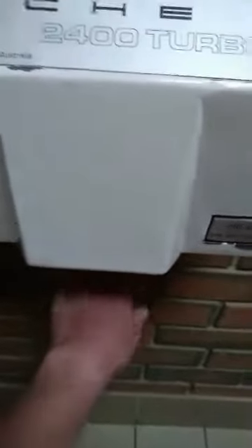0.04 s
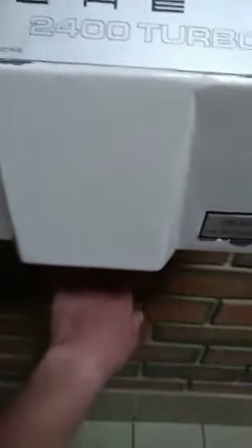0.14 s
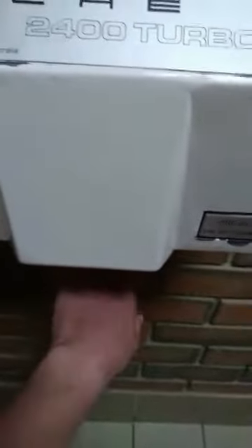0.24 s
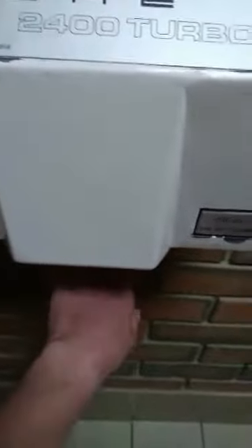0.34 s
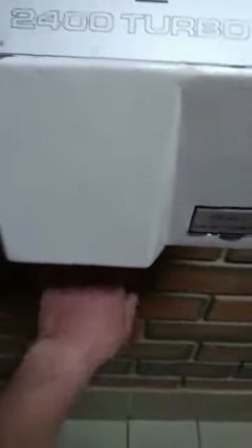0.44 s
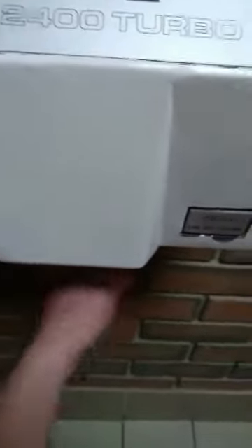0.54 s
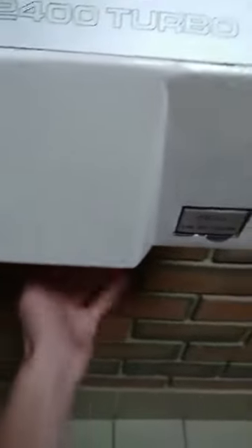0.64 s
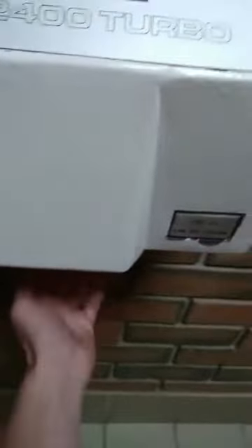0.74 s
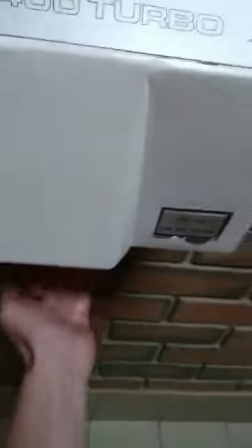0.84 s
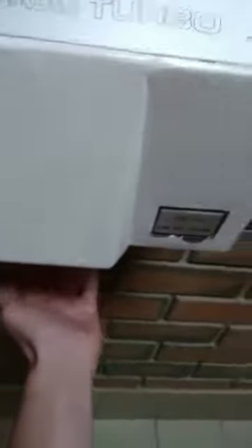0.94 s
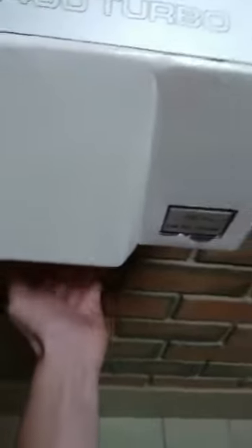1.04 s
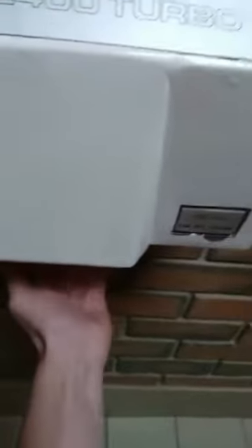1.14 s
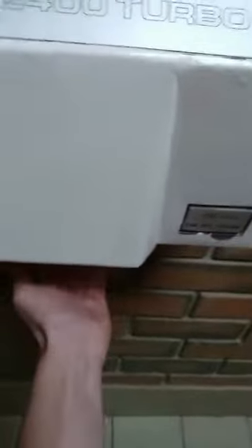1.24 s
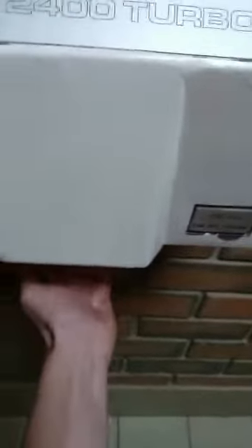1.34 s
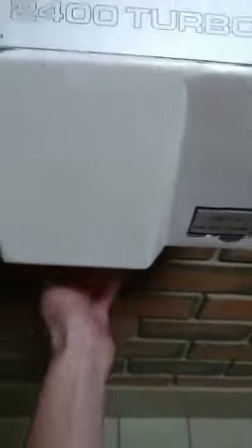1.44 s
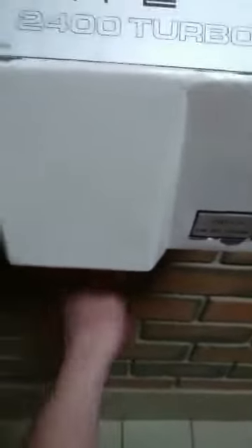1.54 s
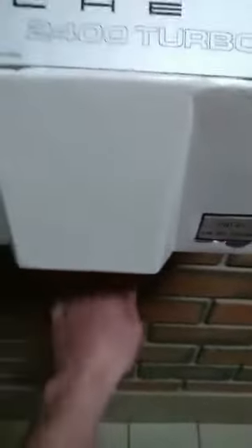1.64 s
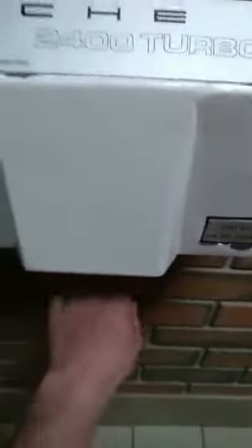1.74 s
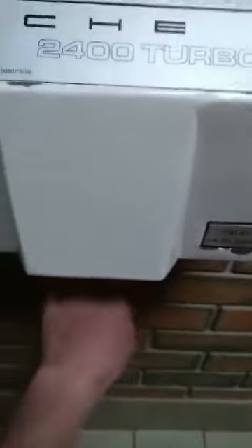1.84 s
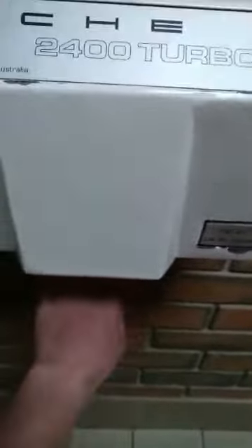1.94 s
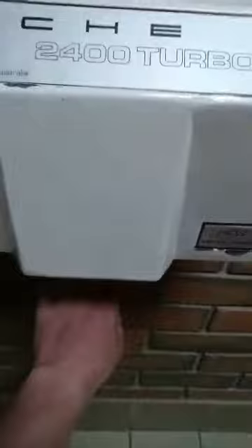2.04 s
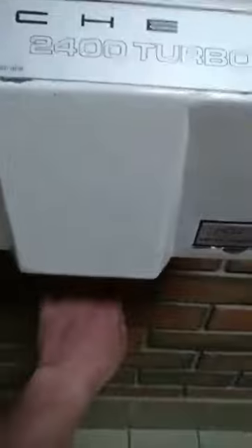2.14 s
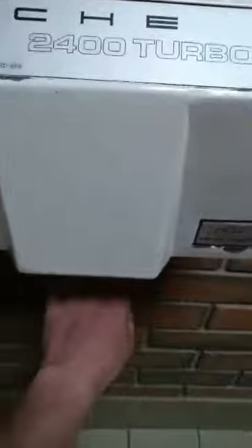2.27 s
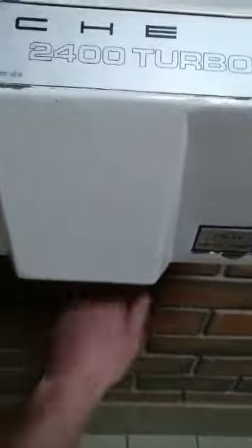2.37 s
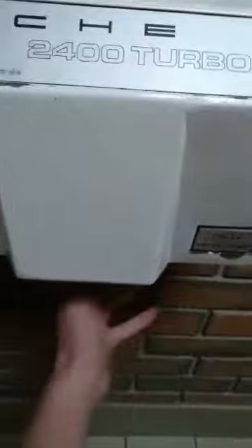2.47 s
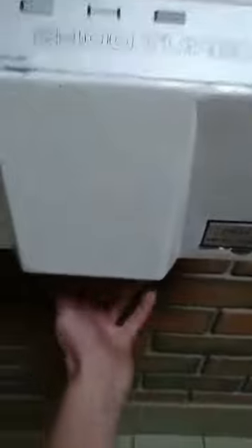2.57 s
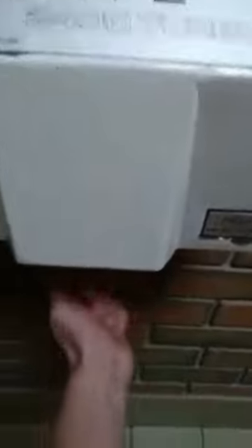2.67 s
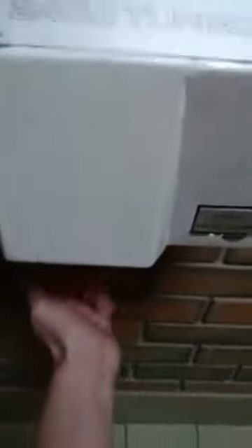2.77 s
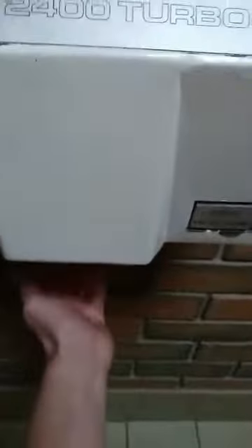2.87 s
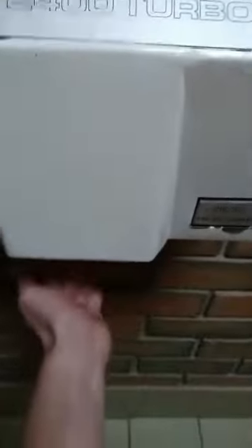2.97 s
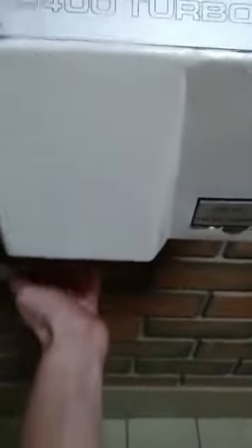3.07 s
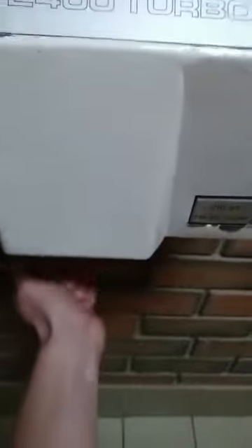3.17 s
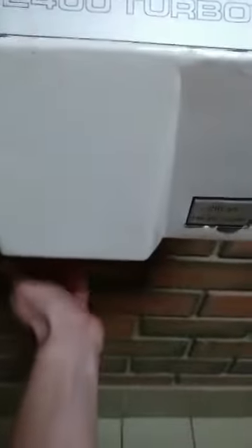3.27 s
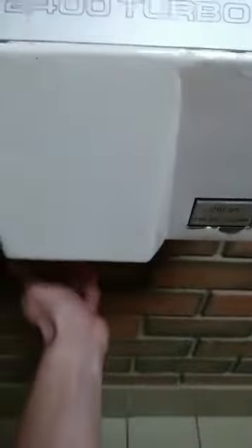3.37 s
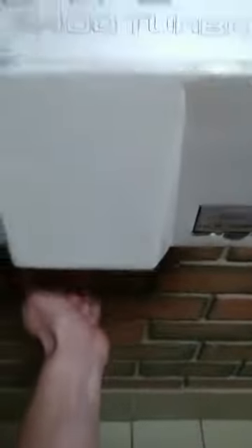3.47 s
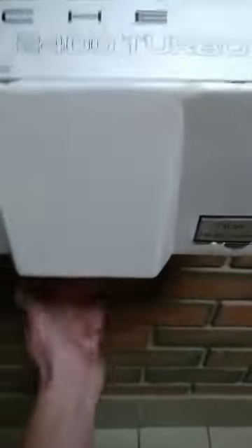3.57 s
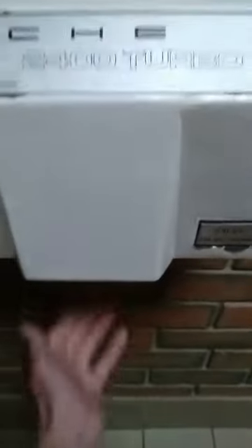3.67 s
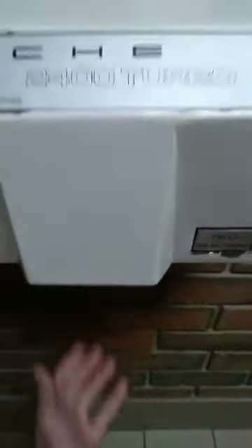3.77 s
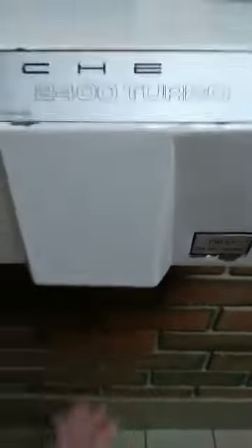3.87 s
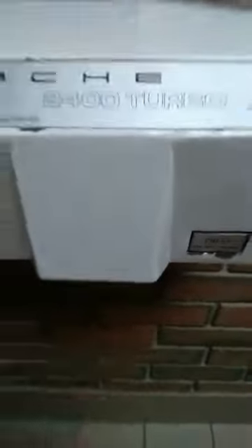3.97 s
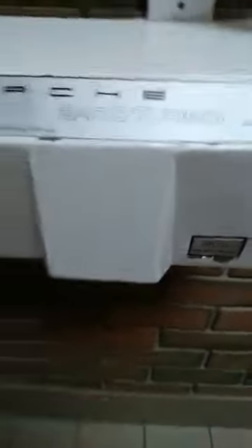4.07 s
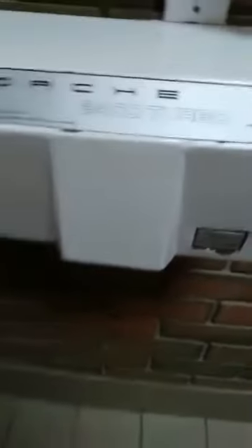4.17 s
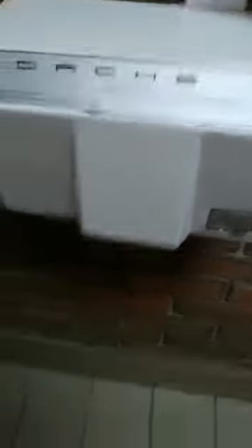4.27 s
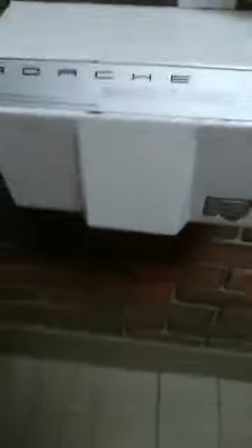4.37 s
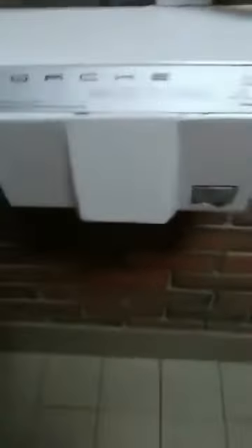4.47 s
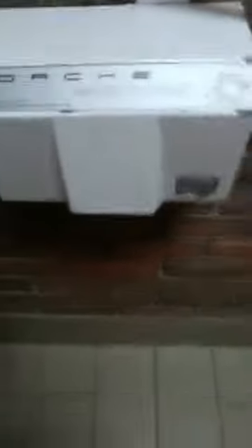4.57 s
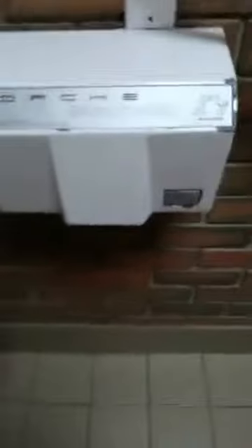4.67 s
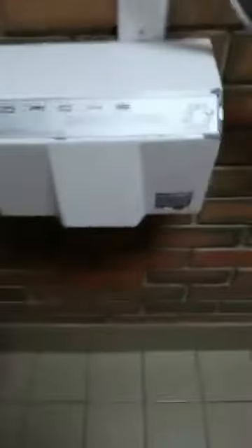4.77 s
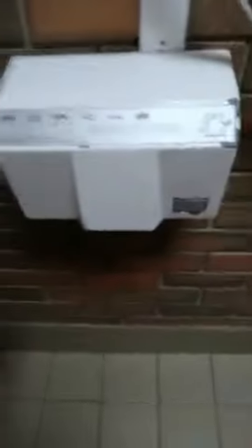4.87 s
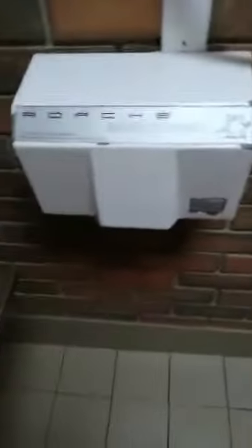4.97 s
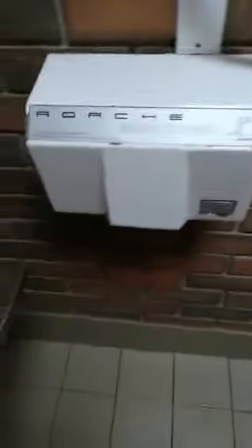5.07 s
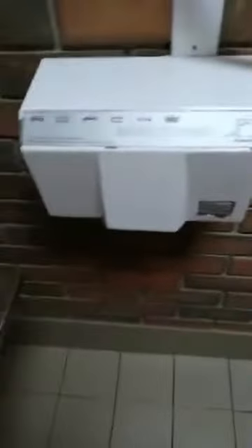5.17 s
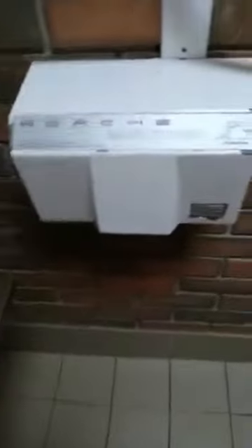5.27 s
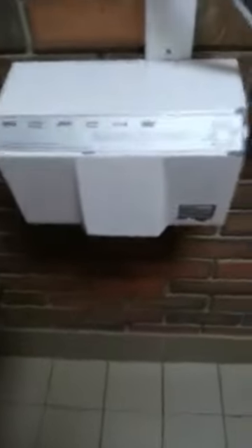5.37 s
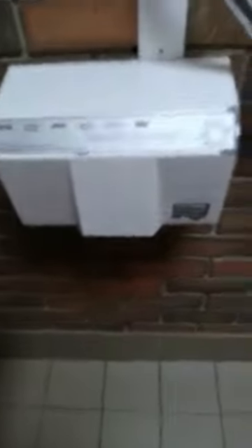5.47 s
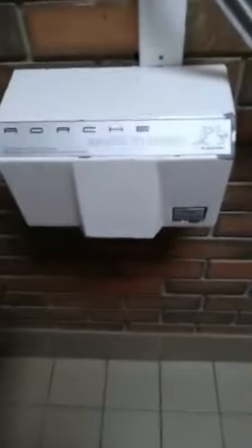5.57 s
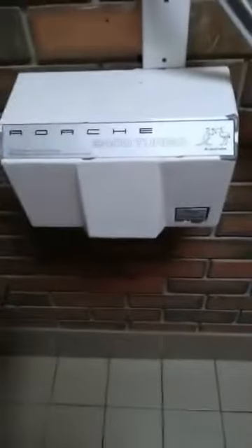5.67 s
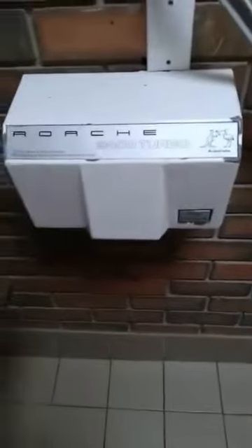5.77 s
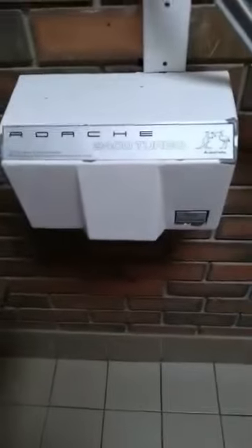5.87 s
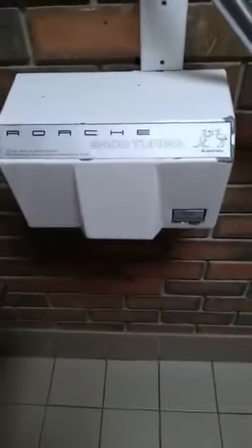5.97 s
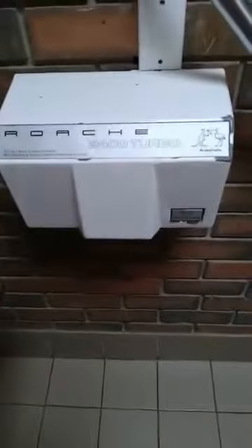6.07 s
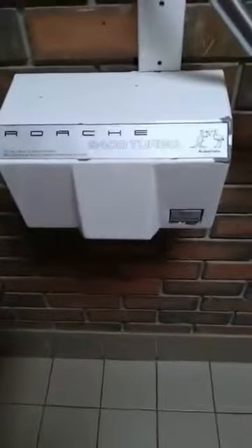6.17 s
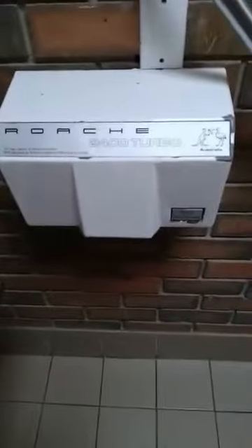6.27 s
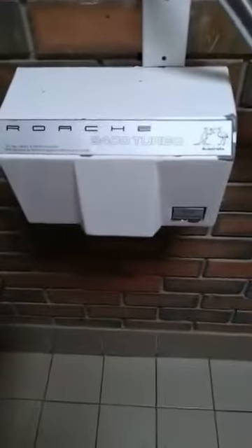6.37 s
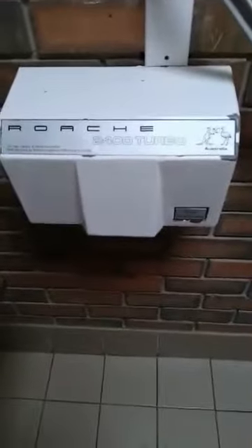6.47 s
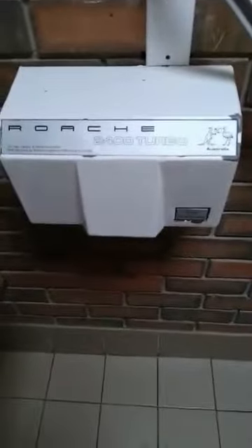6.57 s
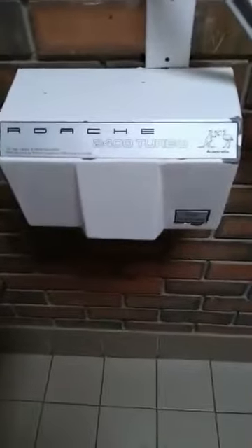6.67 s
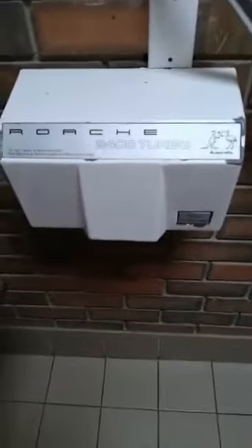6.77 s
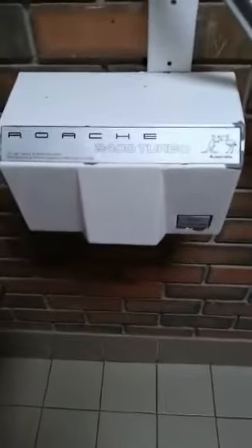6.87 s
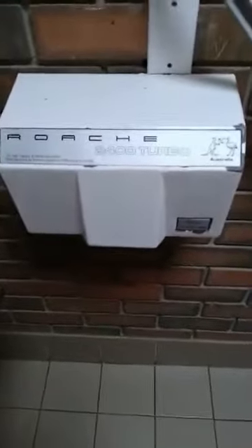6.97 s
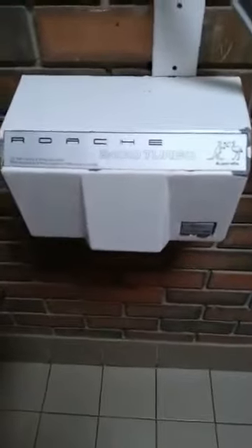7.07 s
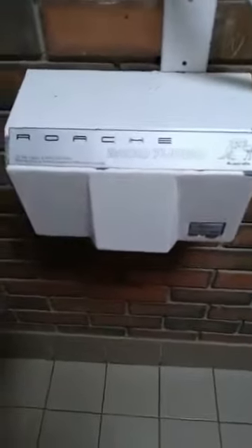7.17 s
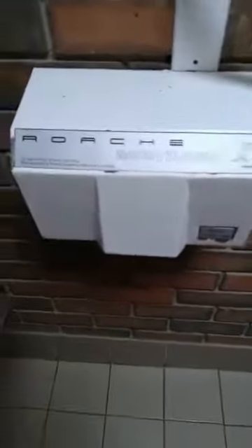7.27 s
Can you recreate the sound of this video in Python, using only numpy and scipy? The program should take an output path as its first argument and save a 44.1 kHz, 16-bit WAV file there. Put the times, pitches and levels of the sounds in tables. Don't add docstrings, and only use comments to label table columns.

```python
import sys
import numpy as np
from scipy import signal
from scipy.fft import rfft, irfft, next_fast_len
from scipy.io import wavfile
from scipy.ndimage import uniform_filter1d

SR = 44100
rng = np.random.default_rng(int(sys.argv[2]) if len(sys.argv) > 2 else 0)


def output_pcm(signal):
    pcm = np.clip(np.atleast_2d(signal).T, -1, 1) * 32767
    wavfile.write(sys.argv[1], SR, np.round(pcm).astype(np.int16))


def volts_from_db(level):
    exponent = np.asarray(level, float) / 20
    return 10 ** exponent


N = 322798
T = np.arange(N) / SR
OFF_S = 5.862
SINK_S, SINK_FADE_S, SINK_DB = 6.78, 0.038, -21


def evened(x):
    return x / np.sqrt(np.mean(x ** 2) + 1e-20)


def read(points, hz, axis=1):
    points = np.transpose(points)
    return np.interp(np.log(hz + 1), np.log(points[0] + 1), points[axis])


def curve(rows, t, axis):
    rows = np.transpose(rows)
    return np.interp(t, rows[0], rows[axis])


def wander(top_hz):
    coarse = T[::256]
    drift = 0
    for f in np.geomspace(top_hz / 20, top_hz, 20):
        drift = drift + np.sin(2 * np.pi * (f * coarse + rng.random())) / np.sqrt(f)
    return np.interp(T, coarse, evened(drift))


def sides(pan_db):
    left, right = volts_from_db(pan_db / 2), volts_from_db(-pan_db / 2)
    return np.array([left, right]) * 2 / (left + right)


FULL_HZ = 284.8
COAST_S, COAST_POWER, COAST_LAG_S = 0.45, 0.55, 0.01197
# [t/s, level/dB, left minus right/dB]
HUM = [(0.0, -23, 14), (0.08, -22, 11), (0.39, -23, 11), (1.1, -26, 15), (1.36, -24.5, 12), (1.94, -22, 10),
       (2.41, -22, 10), (2.79, -24, 12.5), (3.57, -23.5, 10), (4.33, -16, 4), (4.83, -17.5, 1.5),
       (5.2, -16.5, 0.5), (5.61, -17.5, 1.5), (5.82, -17, 0.5)]
# [f/Hz, width/Hz, level/dB, left minus right/dB]
SWEPT_MODES = [(281.7, 12, -17.5, 3.5), (252, 6, -41.5, 6), (242, 4.1, -34, 4), (228, 3.4, -34, 9),
               (215, 5, -43, -8.5), (205.2, 8.6, -29.5, 5), (187.2, 9, -35, 2), (163, 30, -41.5, -0.5)]


def blade_tone():
    coasting_s = np.maximum(T - OFF_S - COAST_LAG_S, 0)
    pitch_hz = FULL_HZ * (1 + coasting_s / COAST_S) ** -COAST_POWER
    steady = volts_from_db(curve(HUM, T, 1)) * sides(curve(HUM, T, 2))
    swept = 0
    for hz, width_hz, db, pan_db in SWEPT_MODES:
        resonance = 1 / (1 + (2 * (pitch_hz - hz) / width_hz) ** 2)
        swept = swept + volts_from_db(db) * sides(pan_db)[:, None] * resonance
    swept = swept * volts_from_db(SINK_DB * np.clip((T - SINK_S) / SINK_FADE_S, 0, 1))
    cut = np.clip((T - OFF_S) / 0.022, 0, 1)
    return pitch_hz, (1 - cut) * steady + cut * swept


# [t/s, distance (0 near, 1 far)]
STEP_BACK = [
    (0, 0.032),
    (3.55, 0.039),
    (4., 0.36),
    (4.4, 0.95),
    (5., 0.91),
    (7.32, 0.97),
]
# [multiple of the shaft turn, near level/dB, far level/dB, coasting level/dB]
SHAFT_ORDERS = [(1, -31, -38, -26), (2, -33, -34, -24), (12, -40, -35, -26), (13.31, -43, -37, -34),
                (15, -30, -39, -32), (17, -36, -41, -32), (18, -38, -40, -30)]
# [t/s, f/Hz, peak level/dB, t60/s, rise/s]
LEFT_RINGING = [
    (5.916, 247.3, -13, .5, 0.016),
]


def fan():
    blades = 6
    pitch_hz, ports = blade_tone()
    turn = 2 * np.pi * np.cumsum(pitch_hz + 0.25 * wander(6)) / SR / blades
    level = np.sqrt(2) * volts_from_db(0.5 * wander(11))
    lead = np.array([[0.08], [-0.08]])
    out = level * ports * np.sin(blades * turn + lead)

    far = curve(STEP_BACK, T, 1)
    coasting = np.clip((T - OFF_S) / 0.28, 0, 1)
    for k, near_db, far_db, coast_db in SHAFT_ORDERS:
        place_db = near_db + far * (far_db - near_db) + coasting * (coast_db - far_db)
        tone = np.sin(k * (turn + lead / 3) + 6 * rng.random())
        out += level * ports.mean(axis=0) * volts_from_db(place_db + 1.3 * wander(8)) * tone

    after = np.maximum(T - OFF_S, 0)
    turn_at_cut = np.interp(OFF_S, T, turn)
    fading = volts_from_db(-17.5 - 60 * after / 0.42) * np.clip(after / 0.035, 0, 1)
    out += fading * np.sin(blades * turn_at_cut + 2 * np.pi * FULL_HZ * after) * sides(1.5)[:, None]
    for s, hz, db, t60, rise_s in LEFT_RINGING:
        passed = np.maximum(T - s, 0)
        swell = volts_from_db(db - 60 * passed / t60) * np.clip(passed / rise_s, 0, 1)
        out += sides(6.0)[:, None] * swell * np.sin(2 * np.pi * hz * passed)
    return out


# [near level/dB, far level/dB, drop at the cut/dB, coasting fade/(dB/s), gate/dB]
AIR = [
    (0.77, -3, -1.5, -14, 0.1),
    (1.5, -2.5, 0.5, -26.5, 0.5),
    (-0.53, -1.5, -8, -16.5, -21.5),
    (-0.29, -5.5, -5, -42.5, -0.5),
]
AIR_HZ = [
    400,
    1500,
    5000,
    9000,
]
# [t/s, length/s, fizz level/dB]
GUSTS = [
    (0., .008, 10.5),
    (0.301, .02, 5.5),
    (0.799, .25, 3),
    (3.847, .3, 2.5),
    (4.951, 0.16, -2.5),
    (5.782, .3, 4.5),
]
GUST_SHARE = [
    .05,
    -.1,
    .35,
    0.97,
]
SINK_SHARE = [
    .05,
    .35,
    .01,
    .01,
]


def air_db(t, hz):
    far_bend = 2.2
    drop_s, gate_s, gate_fade_s, floor_db = 0.1, 6.33, 0.066, -48
    near_db, far_db, drop_db, fade_db, gate_db = np.transpose(AIR)[:, :, None]
    after = np.maximum(t - OFF_S, 0)
    bands = near_db + np.clip(curve(STEP_BACK, t, 1), 0, 1) ** far_bend * (far_db - near_db)
    gust_db = sum(db * np.exp(-((t - s) / length_s) ** 2) for s, length_s, db in GUSTS)
    bands = bands + np.array(GUST_SHARE)[:, None] * gust_db
    bands += drop_db * np.minimum(after / drop_s, 1) + fade_db * after
    bands += gate_db * np.clip((t - gate_s) / gate_fade_s, 0, 1)
    sink = np.clip((t - SINK_S) / SINK_FADE_S + 0.6, 0, 1)
    bands += np.array(SINK_SHARE)[:, None] * SINK_DB * sink
    place = np.interp(np.log(hz + 1), np.log(AIR_HZ), range(4))
    blend = np.maximum(1 - abs(place[:, None] - np.arange(4)), 0)
    return blend @ np.maximum(bands, floor_db)


# [f/Hz, likeness (0-1)]
SAME = [(60, 0.93), (150, 1), (240, 0.72), (340, .86), (450, 0.48), (700, .6), (1000, 0.2), (2000, 0.064),
        (12000, 0.)]


def turbulence(field_db, patchy_db):
    frames, hz = N // 256 + 5, np.fft.rfftfreq(1024, 1 / SR)
    a, b, c, d, patches = rng.standard_normal((frames, 513, 5)).T
    patches = uniform_filter1d(patches, size=10, axis=0)
    patches = evened(uniform_filter1d(patches, size=12, axis=1))
    same = np.clip(read(SAME, hz), 0, 1)[:, None]
    left = a + 1j * b
    right = same * left + np.sqrt(1 - same ** 2) * (c + 1j * d)
    level = volts_from_db(field_db(np.arange(frames) * 256 / SR, hz) + patchy_db * patches)
    return signal.istft(np.array([left, right]) * level, nperseg=1024, noverlap=768)[1][:, :N]


# [f/Hz, width/Hz, near lift level/dB, far lift level/dB]
ROOM = [(83, 15, 8.5, 0), (97.4, 12, 11, 6.5), (130.2, 8.5, 12, 10.5), (158, 9, 10.5, 7),
        (180.6, 12, 1, 10.5), (221.6, 7.3, 11.5, 7), (245.1, 8, 10, 10), (262, 10.5, 11.5, 6.5),
        (318, 4.7, 1.5, -0.5), (325.5, 4.1, 2, 8.5), (351.5, 12, 7.5, 6), (401, 12, 10, 12),
        (441, 7.1, 1.5, 6.5), (480, 3, 3, -5.5), (523, 6.1, 1, 1.5), (625, 20, 4.5, 7), (690, 14, 6.5, 8.5),
        (1024, 51, 7.5, 3.5), (1200, 32, 6, 0), (1258, 34, 3.5, 6.5), (1303, 45, 2.5, 8), (1494, 42, 6, 6),
        (1944, 87, 6.5, 4.5), (2254, 120, 5, 2), (3670, 350, -6, -1), (4520, 880, 2, 1),
        (9150, 2300, 3.5, 6)]
# [f/Hz, near left minus right/dB, far left minus right/dB]
LEAN = [(60, -1.5, -1), (236, 1.5, 3.5), (497, 0.5, -1), (700, 6, -1.5), (1200, -1.5, 2.5), (2120, 7, 1.),
        (2680, -1, 1.5), (9000, 4.5, 2.5)]


def in_room(x, colour, axis, lag_s):
    size = next_fast_len(N + SR)
    hz = np.fft.rfftfreq(size, 1 / SR)
    lift = 1
    for mode in ROOM:
        resonance = 1 / (1 + (2 * (hz - mode[0]) / mode[1]) ** 2) ** 2
        lift = lift * (1 + (volts_from_db(mode[axis + 1]) ** 2 - 1) * resonance)
    shape = volts_from_db(read(colour, hz)) * np.sqrt(lift)

    ragged_db, ragged_hz = 4, 12.0
    knots_hz = np.arange(0, SR / 2, ragged_hz)
    ragged = np.array([np.interp(hz, knots_hz, row[:len(knots_hz)]) for row in rng.standard_normal((2, 8000))])
    ports = sides(read(LEAN, hz, axis)) * np.exp([-2j * np.pi * hz * lag_s, 0 * hz])
    ports *= volts_from_db(ragged_db * ragged * np.clip(hz / 600, 0, 1) ** 2)
    return irfft(rfft(x, size) * ports * shape / np.sqrt(np.mean(shape ** 2)), size)[:, :N]


# [f/Hz, level/dB per Hz]
JET = [(20, -13), (60, -17), (150, -12), (260, 0.5), (330, -8), (550, -17.5), (750, -16), (1000, -24),
       (1350, -20), (1700, -24.5), (2300, -25), (3800, -33.5), (6000, -46), (9200, -52), (11500, -64.5)]


def rush():
    noise = turbulence(air_db, patchy_db=0.5)
    noise = noise / np.sqrt(np.mean(noise[:, :5 * SR] ** 2))
    far = curve(STEP_BACK, T, 1)
    near_jet = in_room(noise, JET, 1, lag_s=0.00017)
    far_jet = in_room(noise, JET, 2, lag_s=0)
    return volts_from_db(-30.5) * ((1 - far) * near_jet + far * far_jet)


# [t/s, level/dB, centre f/Hz, room ring t60/s, left minus right/dB]
TICKS = [(.05, -70, 9000, .1, -3.5), (.17, -67.5, 9000, 0.12, 5), (.30, -69, 9490, 0.15, 4),
         (2.50, -69, 9000, .2, 1.5), (3.75, -70, 7500, 0.092, 1), (4.221, -66.5, 8510, .1, 2.5),
         (4.50, -71.5, 9400, 0.083, 2.5), (5.667, -57.5, 7500, 0.31, 0), (5.858, -52.5, 8000, 0.49, 1),
         (5.862, -46, 2220, 0.67, 0.5), (6.817, -71, 1290, 0.55, 0), (6.861, -70, 1280, 0.24, 0),
         (6.601, -51, 100.5, 0.97, 2), (6.9, -64.5, 998, 0.12, 1), (6.959, -54, 120, .4, 5),
         (7.022, -57, 270, 0.27, 3), (7.048, -84, 1200, 0.18, -4), (7.151, -50, 121, 0.5, 0),
         (7.183, -67, 1290, .14, 1), (7.192, -61, 690, .2, 8), (7.2, -71, 1300, 0.32, -1),
         (7.218, -70, 1400, .15, 0), (7.25, -49, 110, 0.36, -7)]
# [f/Hz, level/dB, t60/s]
COVER_MODES = [(1900, -44, .55), (2060, -49, .35), (2280, -51, .35), (680, -47, .6), (600, -50, .6),
               (9400, -66, .3), (8300, -66, .3), (6800, -66, .25)]


def ticks():
    out, t = np.zeros((2, N + SR)), np.arange(SR // 2) / SR
    hz = np.fft.rfftfreq(len(t), 1 / SR)
    for s, db, centre_hz, t60, pan_db in TICKS:
        band = np.exp(-(np.log((hz + 1) / centre_hz) / 0.5) ** 2 - (hz / 11000) ** 8)
        burst = evened(irfft(rfft(rng.standard_normal((2, len(t)))) * band, len(t)))
        shape = volts_from_db(-60 * t / t60) + 1.2 * volts_from_db(-60 * t / 0.06)
        shape *= np.clip(t / 0.0012, 0, 1)
        out[:, round(s * SR):][:, :len(t)] += volts_from_db(db) * burst * shape * sides(pan_db)[:, None]
    beat = 1 + 0.46 * np.sin(2 * np.pi * 25 * t)
    for mode_hz, db, t60 in COVER_MODES:
        ring = np.sin(2 * np.pi * mode_hz * t + rng.random((2, 1))) * np.clip(t / 0.0048, 0, 1)
        out[:, round(OFF_S * SR):][:, :len(t)] += volts_from_db(db - 60 * t / t60) * beat * ring
    return out[:, :N]


# [f/Hz, level/dB per Hz]
QUIET = [(30, -23), (60, -25.5), (90, -10), (140, -9.5), (240, -17.5), (280, -0.5), (330, -20),
         (520, -30.5), (700, -25.5), (900, -37.5), (2000, -53), (3000, -68), (4500, -66), (12500, -69)]


def background():
    quiet_db, drone_hz, drone_db = -49, 25.0, -42.6
    tone = in_room(evened(turbulence(lambda t, hz: 0, patchy_db=2.5)), QUIET, 2, lag_s=0)
    turns = np.cumsum(drone_hz + 0.16 * wander(3.3)) / SR
    port_drift = 0.2 * np.array([wander(5), wander(5)])
    drone = np.sin(2 * np.pi * (turns) + 2 * np.pi * port_drift)
    return volts_from_db(quiet_db) * tone + np.sqrt(2) * volts_from_db(drone_db + 1.1 * wander(10)) * drone


def scene():
    return fan() + rush() + ticks() + background()


def low_pass(x):
    return signal.sosfilt(signal.butter(12, 11870, fs=SR, output="sos"), x)


def record(dry):
    both = np.array([[1, 1], [1, -0.98]]) / np.sqrt(2)
    window = dict(nperseg=2048, noverlap=1024, window="cosine")
    hz, t, z = signal.stft(both @ dry, SR, **window)
    cell = uniform_filter1d(abs(z) ** 2, size=6, axis=1)
    wide = uniform_filter1d(cell, size=48, axis=1)
    around = np.minimum(uniform_filter1d(wide, size=7, axis=2), 2.3 * wide)
    threshold = np.interp(hz, [1500, 3500, 6000, 9000], [0, 0.5, 0.5, 0.35])[:, None]
    kept = z * np.where(cell < around * threshold, volts_from_db(-18), 1)
    thinned = both @ signal.istft(kept, SR, **window)[1][:, :N]
    end_fade = np.clip((T[-1] - T) / 0.0057, 0, 1)
    return low_pass(thinned * end_fade)


dry = scene()
out = record(dry)
output_pcm(out)
```